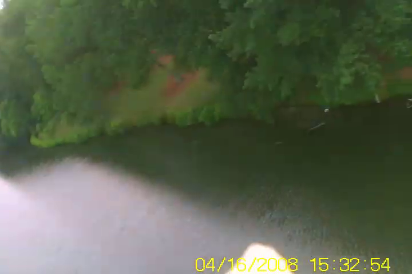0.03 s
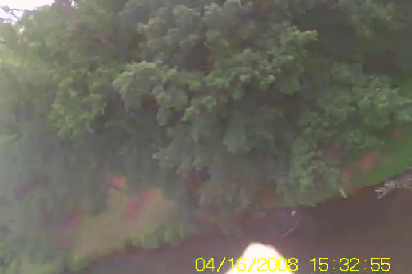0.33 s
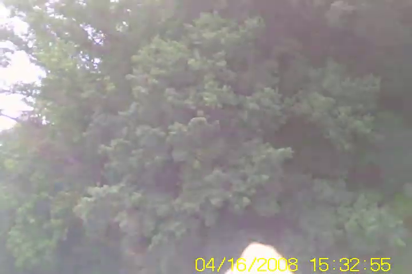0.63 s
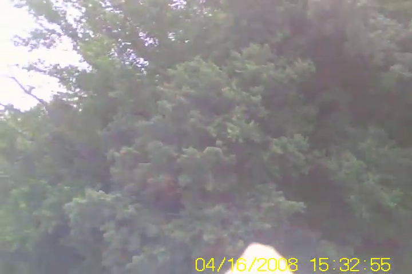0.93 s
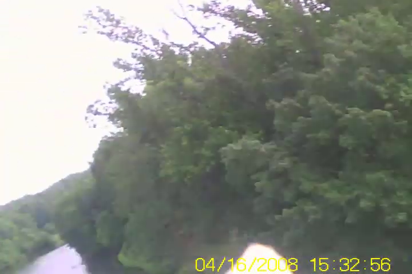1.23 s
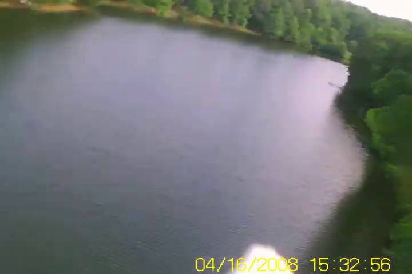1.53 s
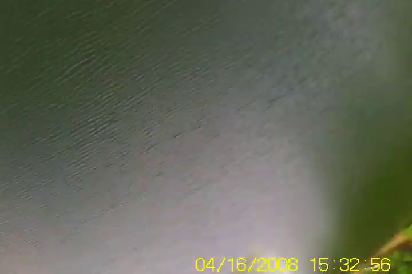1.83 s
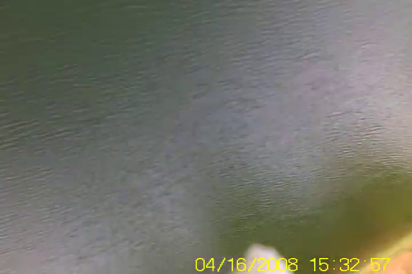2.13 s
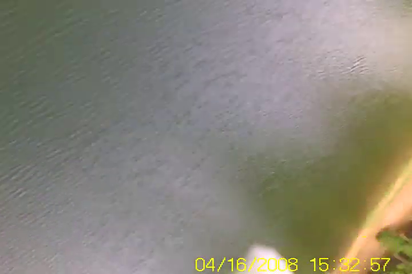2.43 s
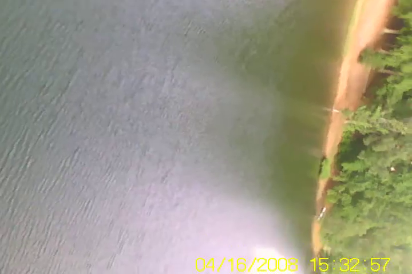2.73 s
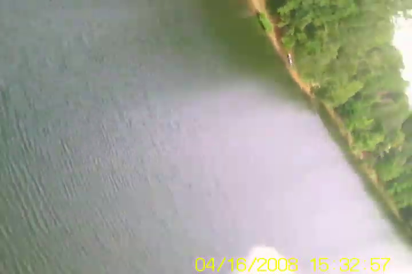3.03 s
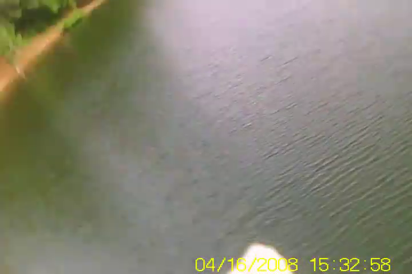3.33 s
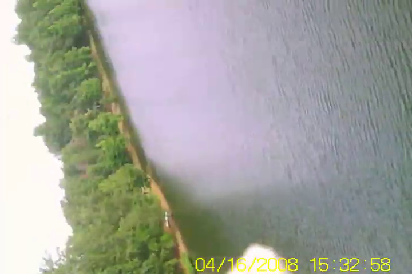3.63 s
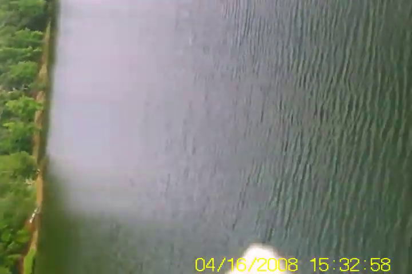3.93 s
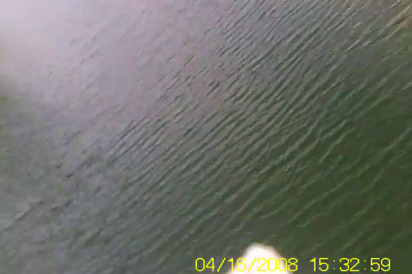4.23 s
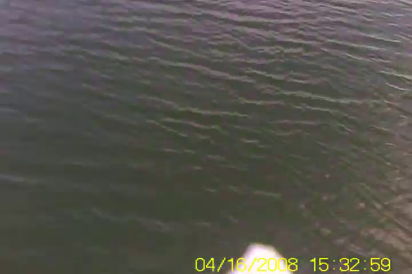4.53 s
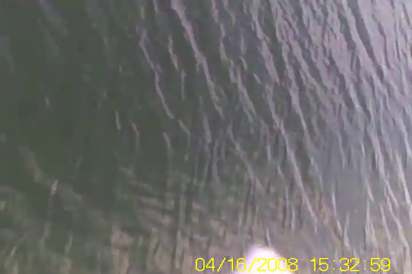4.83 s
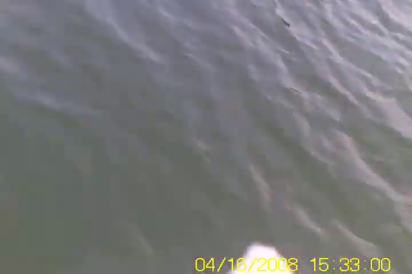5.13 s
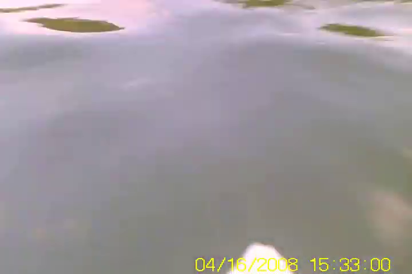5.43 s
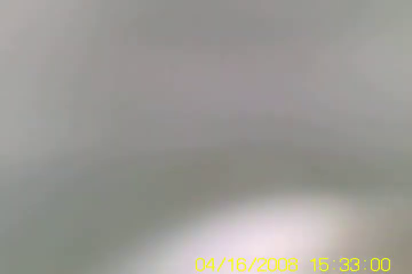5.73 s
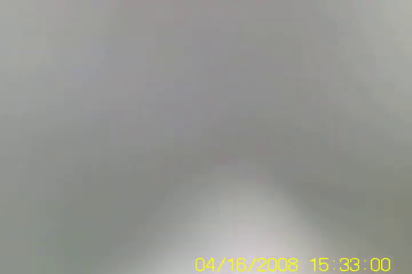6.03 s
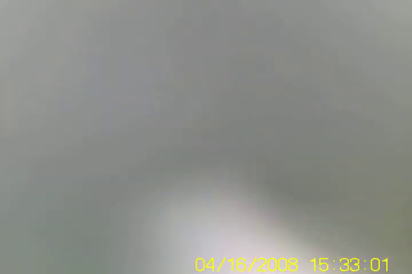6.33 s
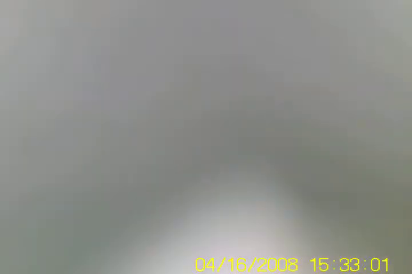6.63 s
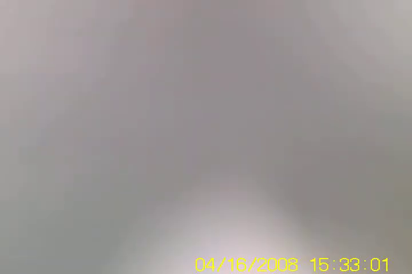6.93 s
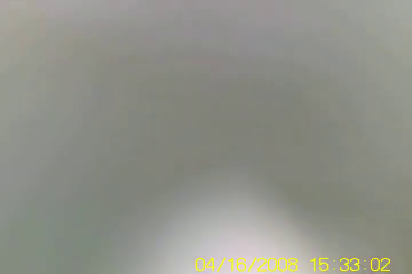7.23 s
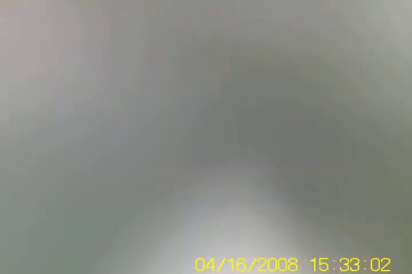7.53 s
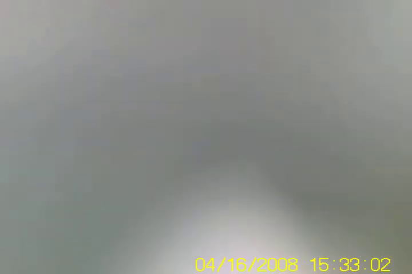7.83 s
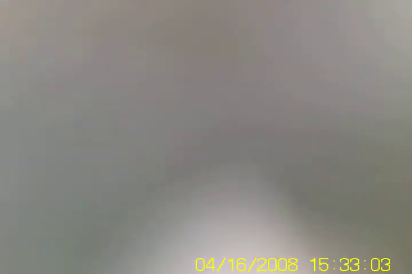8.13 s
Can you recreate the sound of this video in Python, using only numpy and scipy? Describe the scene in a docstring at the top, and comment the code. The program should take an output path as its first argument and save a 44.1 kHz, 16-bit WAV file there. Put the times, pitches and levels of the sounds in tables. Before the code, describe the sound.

Wind buffets and rushes over a small model plane's buzzing propeller, then a sharp splash cuts it off, leaving faint muffled gurgling.

```python
"""A small electric model plane flies low over a lake, heard from a camera on its nose.
Its propeller, a harmonic series on the blade rate, revs up once and sags; the motor controller whines.
Turbulent air buffets the microphone and rushes over the airframe. The plane slaps into the water,
overloading the microphone, and floats among muffled, resonating bubbles and the camera's own hiss."""
import sys
import numpy as np
from scipy import signal
from scipy.fft import rfft, irfft
from scipy.io import wavfile
from scipy.ndimage import uniform_filter1d

SR = 44100
rng = np.random.default_rng(int(sys.argv[2]) if len(sys.argv) > 2 else 0)


def put_to_file(sound):
    """Save the sound as 16-bit audio at rate SR, in the file named by the first command-line argument."""
    columns = np.atleast_2d(sound).T  # one column per channel
    safe = np.clip(columns, -1, 1)
    whole_steps = np.round(safe * 32767)
    wavfile.write(sys.argv[1], SR, whole_steps.astype(np.int16))


N = 370440
T = np.arange(N) / SR
IMPACT_S = 5.4082

# spectrum of water gurgling against the case: f/Hz, relative level/dB
GURGLE_SPECTRUM = [(100, -7.5), (300, -1), (750, -4), (1100, -15.5), (1800, -20.5), (2700, -16.5),
                   (3600, -31), (7000, -40)]


def amp(db):
    """Amplitude ratio of a level in decibels."""
    return 10 ** (np.asarray(db) / 20)


def unit_rms(x):
    """Normalisation to an rms of one."""
    return x / np.sqrt(np.mean(x ** 2) + 1e-20)


def level_at(spectrum, hz):
    """Level of a spectrum at hz, interpolated on a logarithmic frequency axis."""
    f, db = np.transpose(spectrum)
    return np.interp(np.log(hz + 1), np.log(f + 1), db)


def curves(rows):
    """Linear interpolation of each column of a time table to every sample."""
    times, *columns = np.transpose(rows)
    return [np.interp(T, times, column) for column in columns]


def noise(spectrum):
    """Spectrally shaped noise of rms one, rolling off above the last point."""
    hz = np.fft.rfftfreq(N, 1 / SR)
    gain = amp(level_at(spectrum, hz)) / np.maximum(hz / spectrum[-1][0], 1) ** 2
    return unit_rms(irfft(rfft(rng.standard_normal(N)) * gain, N))


def wander(rate_hz):
    """Band-limited random modulation of rms one, up to about rate_hz."""
    hz = np.fft.rfftfreq(N, 1 / SR)
    gain = hz / (hz + rate_hz / 10) * np.exp(-(hz / rate_hz) ** 2)
    return unit_rms(irfft(rfft(rng.standard_normal(N)) * gain, N))


def steadied(x, samples=6000):
    """Division by the running rms removes slow swells and keeps quick fluctuations."""
    return x / np.sqrt(uniform_filter1d(uniform_filter1d(x ** 2, samples), samples) + 1e-12)


def camera():
    """Electronic self-noise: faint pure tones over a broadband hiss."""
    # electronic whistles: f/Hz, rms level/dB
    tone_lines = [(1200, -83.5), (3892, -83), (5599, -84), (6202, -91), (7402, -83.5), (9598, -88.5)]
    # noise floor: f/Hz, relative level/dB
    floor_spectrum = [(100, 0), (1500, -2.5), (4000, -2.5), (9000, -1.5), (10500, -4), (12000, -30),
                      (13500, -47.5)]
    tones = sum(amp(db) * np.sqrt(2) * np.sin(2 * np.pi * hz * T) for hz, db in tone_lines)
    return tones + amp(-73.5) * noise(floor_spectrum)


def bubble(hz, t60):
    """A bubble is a damped oscillator: it swells within a cycle and rings with rising pitch."""
    t = np.arange(SR // 10) / SR
    envelope = amp(-60 * t / t60) * (1 - np.exp(-4 * hz * t))
    return envelope * np.sin(2 * np.pi * hz * t * (1 + 1.5 * t))


def fizz(sizes=24, bubbles_per_s=86):
    """Tiny bubbles of many sizes ring against the case as a Poisson process; rms one."""
    out = np.zeros(N)
    for hz in np.geomspace(330, 1050, sizes):
        strengths = amp(3 * np.minimum(rng.exponential(1, N), 3))
        onsets = rng.random(N) < bubbles_per_s / sizes / SR
        ring = amp(level_at(GURGLE_SPECTRUM, hz)) * bubble(hz, t60=11 / hz)
        out += signal.oaconvolve(strengths * onsets, ring)[:N]
    return unit_rms(out)


def large_bubbles():
    """Larger bubbles and droplets ring singly, each at its own resonance."""
    # bubbles and droplets: t/s, level/dB, f/Hz, t60/s
    resonances = [(5.4525, -19, 5000, .003), (5.4873, -39.5, 5960, .008), (5.528, -42, 6000, .012),
                  (5.566, -37, 365, 0.057), (5.636, -49.5, 566, .018), (5.791, -57, 900, 0.037),
                  (5.834, -40.5, 521, 0.014), (5.858, -45.5, 395, 0.049), (5.877, -50, 441, .041),
                  (6.02, -57, 750, .043), (6.132, -45.5, 600, .008), (6.195, -54, 706, .026),
                  (6.42, -57, 650, .02), (7.008, -56, 416, .045), (7.039, -48, 601, 0.0065),
                  (7.433, -60, 748, .03), (7.531, -58, 2600, .008), (7.576, -35.5, 522, 0.0059),
                  (7.827, -59, 2700, .009)]
    out = np.zeros(N)
    for s, db, hz, t60 in resonances:
        ring = amp(db) * bubble(hz, t60)
        span = out[round(s * SR):][:len(ring)]
        span += ring[:len(span)]
    return out


def calming(start_db, fall_db_per_s, rest_db):
    """Gain of water stirred by the impact: exponential decay towards a resting level."""
    stirred = amp(start_db - fall_db_per_s * np.maximum(T - IMPACT_S, 0))
    return (T > IMPACT_S) * np.hypot(stirred, amp(rest_db))


def water():
    """Surface waves rock the floating plane; bubbles gurgle in clumps, most where a wavelet laps."""
    # rumble of the rocking: f/Hz, relative level/dB
    rocking_spectrum = [(8, -8), (22, 3), (45, -1), (70, -6), (130, -12), (300, -28.5), (900, -52.5)]
    # wavelets against the case: t/s, duration/s, gain/dB
    wavelets = [(5.63, 0.043, 5), (5.847, .08, 5), (6.099, 0.15, 4), (7.03, 0.083, 7), (7.54, .05, 8)]
    swell_db = 5 * np.maximum(T - 6.2, 0)  # the rocking slowly builds again
    laps_db = sum(db * np.exp(-(2 * (T - s) / length) ** 2) for s, length, db in wavelets)
    rocking_gain = calming(start_db=-42.5, fall_db_per_s=46, rest_db=-65) * amp(swell_db)
    gurgle_gain = calming(start_db=-57, fall_db_per_s=18, rest_db=-77) * amp(.31 * swell_db + laps_db)
    rocking = steadied(noise(rocking_spectrum))
    gurgle = .79 * unit_rms(noise(GURGLE_SPECTRUM) * amp(3.8 * wander(60))) + .34 * fizz()
    return rocking_gain * rocking + gurgle_gain * gurgle


def whistles():
    """Frequency-modulated tones: brief whistles arch and waver as the plane passes the trees."""
    # whistles: t/s, duration/s, f/Hz, peak level/dB
    whistle_events = [(.535, .05, 3620, -36.5), (.578, .06, 4370, -44), (.635, .06, 4400, -53)]
    out, waver = np.zeros(N), wander(300)
    for s, length, top_hz, db in whistle_events:
        arch = np.sin(np.pi * np.clip((T - s) / length, 0, 1))
        hz = top_hz * (1 + .05 * (arch - 1) + .016 * waver)
        out += amp(db) * arch * np.sin(2 * np.pi * np.cumsum(hz) / SR)
    return out


def gusts(hz, spread_octaves=1.15):
    """Gain in dB of a layer centred on hz: large eddies thump low, small ones flap or hiss."""
    # single gusts: t/s, duration/s, gain/dB, centre f/Hz
    gust_events = [(1.06, 0.033, 3.5, 35), (1.136, 0.075, 3, 450), (1.441, 0.03, 13, 1630),
                   (1.472, 0.087, 15.5, 21.8), (1.513, 0.091, 4.5, 400), (1.546, 0.061, 10.5, 1180),
                   (1.73, 0.5, 7, 22), (2.711, 0.028, 12.5, 8500), (2.94, 0.33, 6, 500),
                   (3.168, 0.053, 4.5, 35), (3.22, 0.073, 3.5, 650), (3.315, 0.046, 10, 90),
                   (3.545, 0.057, 6, 95), (4.025, 0.059, 6, 45), (4.212, .07, 6, 30), (4.336, 0.17, 6, 130),
                   (4.615, .06, 5, 25), (4.62, .04, 7.5, 450), (5.22, 0.3, 9, 40)]
    lift_db = np.zeros(N)
    for s, length, db, centre_hz in gust_events:
        distance = np.log2(hz / centre_hz) / spread_octaves
        lift_db += db * np.exp(-distance ** 2 / 2 - (2 * (T - s) / length) ** 2)
    return lift_db


def airframe_rush(rush_db, cruise_db=-39.5, treble_hz=1640):
    """Flow noise over the airframe: the faster the air streams, the brighter its spectrum."""
    # rush at cruising speed: f/Hz, relative level/dB
    rush_spectrum = [(100, -8.5), (350, 0.5), (620, -3), (1050, -1.5), (1400, -1), (2000, 1), (2600, -4),
                     (3200, -7), (4100, -20), (5200, -30.5), (9000, -65.5)]
    air = noise(rush_spectrum)
    treble = signal.sosfiltfilt(signal.butter(2, treble_hz, "highpass", fs=SR, output="sos"), air)
    return air + treble * (amp(.6751 * (rush_db - cruise_db)) - 1)


def wind(chop):
    """Turbulent pressure fluctuations hit the microphone, over flow noise chopped by the blades."""
    # airflow in climb, stall and dive: t/s, buffeting level/dB, rush level/dB
    airflow_levels = [(0, -29, -33), (.2, -34.5, -32.5), (.45, -30, -35), (.9, -20.5, -36.5),
                      (1.25, -21, -37.5), (1.47, -20.5, -42.5), (1.64, -30.5, -41), (1.67, -35.5, -48.5),
                      (1.9, -34, -51.5), (2.12, -32.5, -48), (2.56, -28.5, -41), (3.05, -30, -40.5),
                      (3.2, -21.5, -37), (3.4, -24.5, -42.5), (3.8, -21, -38.5), (4.33, -24.5, -36.5),
                      (4.5, -30.5, -38), (4.8, -32.5, -38.5), (5.15, -34.5, -34.5), (5.4, -33.5, -35.5)]
    # course of the treble hiss: t/s, level/dB
    hiss_levels = [(0, -40), (.68, -43.5), (1.15, -50), (1.55, -57), (1.7, -63), (1.92, -61.5), (2.1, -49),
                   (2.9, -52), (3.2, -47.5), (3.45, -53), (4.35, -48.5), (4.75, -51.5), (5.35, -46.5)]
    # spectra of the wind's layers: f/Hz, relative level/dB
    swing_spectrum = [(8, -5), (22, 0.5), (45, -5), (70, -7.5), (130, -22), (400, -51.5)]  # slow pressure swings
    buffet_spectrum = [(25, -16.5), (70, 1.5), (120, 2), (200, -1), (300, -9), (500, -18.5), (1000, -33),
                       (2500, -48.5), (6000, -84.5)]  # eddies on the microphone
    tearing_spectrum = [(120, -25), (300, 3), (480, -4.5), (750, -9), (1200, -15), (2200, -17.5),
                        (3500, -38), (6000, -55)]  # the strongest eddies, reaching the middle range
    hiss_spectrum = [(2300, -6.5), (3000, 15), (3500, 13), (4200, 4), (5100, 1), (6200, 3.5), (7300, -3.5),
                     (8500, 2.5), (9300, -5), (10400, -10.5), (11400, -18.5), (12500, -51)]  # treble of the airflow
    buffet_db, rush_db = curves(airflow_levels)
    hiss_db, = curves(hiss_levels)
    swings_db = 8.5 + .49 * buffet_db + .55 * rush_db
    tearing_db = 4 + 1.2 * buffet_db + .19 * rush_db
    eddies = wander(70)
    swings = amp(swings_db + gusts(hz=29.96)) * steadied(noise(swing_spectrum))
    buffet = steadied(noise(buffet_spectrum) * amp(1.3 * eddies), samples=4000)
    buffet *= amp(buffet_db + gusts(hz=126))
    tearing = steadied(noise(tearing_spectrum) * amp(1.8 * eddies), samples=3000)
    tearing *= amp(tearing_db + gusts(hz=450))
    flutter = amp(.6 * eddies + .96 * wander(250)) * chop
    rush = amp(rush_db + .5 + gusts(hz=1913)) * airframe_rush(rush_db) * unit_rms(flutter)
    hiss = amp(hiss_db + gusts(hz=6000)) * unit_rms(noise(hiss_spectrum) * flutter)
    return swings + buffet + tearing + rush + hiss


def splash(attack_s=.001):
    """Impact noise: water slams on the nose with a knock, bursts of spray and heavy pushes."""
    # blows as the nose goes in: t/s, hold/s, t60/s, spray level/dB, push level/dB
    blows = [(5.4085, 0.022, 0.0056, -0.5, -11.5), (5.432, .017, .035, -26.5, -16.5),
             (5.465, .012, 0.099, -46.5, -25), (5.5, 0.018, 0.5, -68.5, -48.5)]
    # brief ringing tones that colour the splash with a knock: f/Hz, level/dB, t60/s
    knock_tones = [(453, -11, .05), (1101, -9.5, .05), (2820, -12, .04)]
    # spectra of the spray and of the push: f/Hz, relative level/dB
    spray_spectrum = [(100, 1.5), (300, -2), (450, 4), (750, -5), (1100, -3), (1500, -5.5), (2400, 0),
                      (3200, -2.5), (4300, -7), (6200, -5), (8700, -4), (10600, -5), (11800, -19.5),
                      (13000, -53.5)]
    push_spectrum = [(15, -16.5), (40, 6.5), (100, 0), (200, -8), (400, -15), (900, -20.5), (2500, -50.5)]
    spray = steadied(noise(spray_spectrum) * amp(4 * wander(600)), samples=500)
    push = steadied(noise(push_spectrum), samples=700)
    slaps = np.zeros(N)
    for s, hold, t60, spray_db, push_db in blows:
        envelope = np.clip((T - s) / attack_s, 0, 1) * amp(-60 * np.maximum(T - s - hold, 0) / t60)
        slaps += envelope * (amp(spray_db) * spray + amp(push_db) * push)
    age = np.maximum(T - IMPACT_S, 0)
    knock = sum(amp(db - 60 * age / t60) * np.sin(2 * np.pi * hz * age) for hz, db, t60 in knock_tones)
    return slaps + knock


def controller_whine(blade_phase, switching_hz=8023):
    """A switching tone whose level follows the throttle; rotation modulates it, adding sidebands."""
    # throttle moves: t/s, duration/s, whine level reached/dB
    throttle_moves = [(0, .02, -69), (.3, .4, -100), (1.7, .26, -47.5), (2.05, .4, -51.5), (2.9, .25, -47),
                      (3.29, 0.072, -60), (4.46, .05, -57), (5.02, .04, -63)]
    gain = np.zeros(N)
    for s, length, db in throttle_moves:
        gain += (amp(db) - gain) * np.clip((T - s) / length, 0, 1)
    carrier = np.sqrt(2) * np.sin(2 * np.pi * switching_hz * T)
    return gain * amp(.7 * wander(30)) * carrier * (1 + np.cos(blade_phase) / 10)


def airframe_hum(blade_hz, blade_phase, level_db):
    """Forced vibration at harmonics of the shaft rate, strongest on the airframe's resonance."""
    # response of the airframe to the motor: f/Hz, level/dB
    hum_response = [(120, -49), (200, -48.5), (270, -48.5), (380, -41), (480, -54), (600, -61), (800, -79)]
    shaking = np.clip(amp(level_db + 59.5), 0, 1)  # dies away when the throttle is cut
    hum = np.zeros(N)
    for k in range(2, 7):
        partial_db = level_at(hum_response, k * blade_hz / 2) + 2 * wander(8.5)
        hum += amp(partial_db) * np.cos(k * blade_phase / 2)
    return shaking * hum


def bite_level(blade_hz, lag_s=.045, full_bite_hz=290, db_per_octave=38):
    """Propeller level in dB: the blades bite with a first-order lag and are quieter when slow."""
    pole = np.exp(-1 / (lag_s * SR))
    lagged_hz = blade_hz[0] + signal.lfilter([1 - pole], [1, -pole], blade_hz - blade_hz[0])
    return -37 + db_per_octave * np.minimum(np.log2(lagged_hz / full_bite_hz), 0)


def propeller():
    """Periodic blade strokes radiate harmonics. Returns the sound, the air's chop and the phase."""
    # the motor idling down, revving up and sagging: t/s, blade rate f/Hz
    blade_rates = [(0, 226), (.6, 222), (1.72, 150), (1.9, 215), (2.04, 310), (2.1, 331), (2.16, 335.5),
                   (2.27, 328), (2.48, 303.5), (2.62, 286), (2.9, 246.5), (3.25, 246), (3.45, 205),
                   (5.4, 193)]
    # spectrum of a blade stroke: f/Hz, relative level/dB
    stroke_spectrum = [(150, -7), (330, -3), (660, -10.5), (880, -13), (1000, -5.5), (1320, -13.5),
                       (1500, -7), (1700, -12), (2200, -6.5), (2700, -14), (3350, -15.5), (4300, -27),
                       (5200, -36), (7000, -43)]
    blade_hz, = curves(blade_rates)
    level_db = bite_level(blade_hz)
    phase = 2 * np.pi * np.cumsum(blade_hz * (1 + .0015 * wander(60))) / SR
    strokes = np.zeros(N)
    for k in range(1, 19):
        offset, half_offset = rng.uniform(0, 2 * np.pi, 2)
        partial_db = level_at(stroke_spectrum, k * blade_hz) + 1.8 * wander(18)  # uneven inflow
        half_order = .16 * np.cos((k + .5) * phase + half_offset)  # unequal blades
        strokes += amp(partial_db) * (np.cos(k * phase + offset) + half_order)
    hum = airframe_hum(blade_hz, phase, level_db)
    chop = 1 + .5 * amp(level_db - level_db.max()) * np.cos(phase)
    return strokes * amp(level_db + .47 * wander(40)) + hum, chop, phase


def scene():
    """Superposition at one microphone; wind and motor end in the splash."""
    drone, chop, blade_phase = propeller()
    airborne = np.interp(T - IMPACT_S, [0, .022], [1, 0])
    flight = airborne * (wind(chop) + drone + controller_whine(blade_phase)) + whistles()
    return (flight + splash() + water() + large_bubbles() + camera())[None]


def record(dry, ceiling=.73, band_limit_hz=16200, dc_offset=-.009):
    """Hard clipping on the splash, then treble roll-off, a band limit and a slight DC offset."""
    # treble roll-off of the camera: f/Hz, gain/dB
    treble_response = [(0, -0.5), (10500, -2), (12200, -6), (16000, -12)]
    clipped = np.clip(dry, -ceiling, ceiling)
    gain = amp(level_at(treble_response, np.fft.rfftfreq(2 * N, 1 / SR)))
    dulled = irfft(rfft(clipped, 2 * N) * gain)[:, :N]
    band_filter = signal.firwin(511, band_limit_hz, window=("kaiser", 9), fs=SR)
    return dc_offset + signal.oaconvolve(dulled, band_filter[None], "same")


dry = scene()
out = record(dry)
put_to_file(out)
```